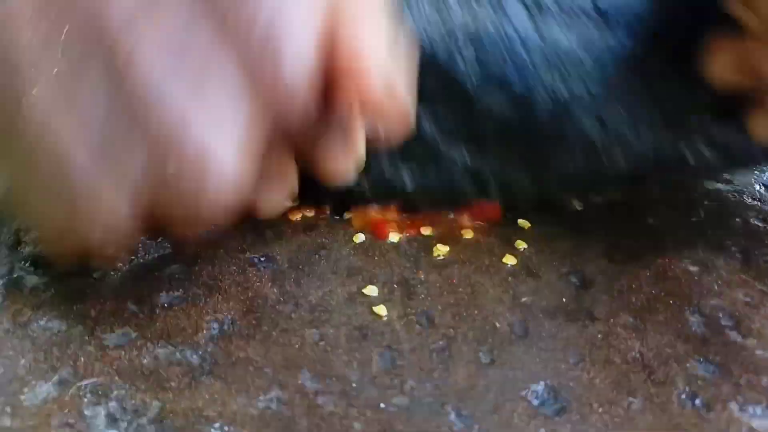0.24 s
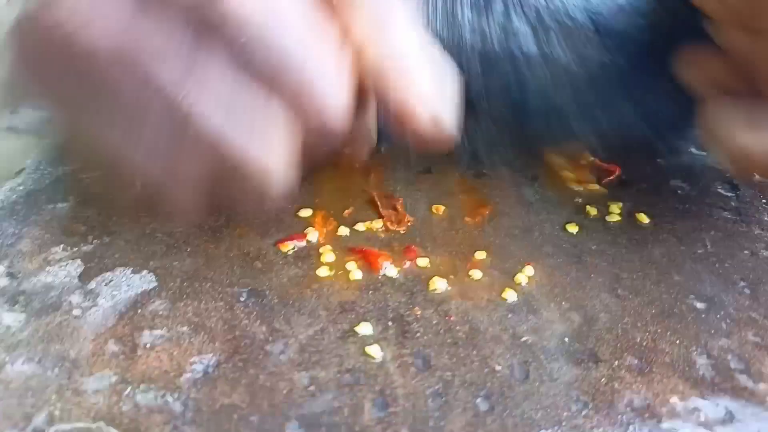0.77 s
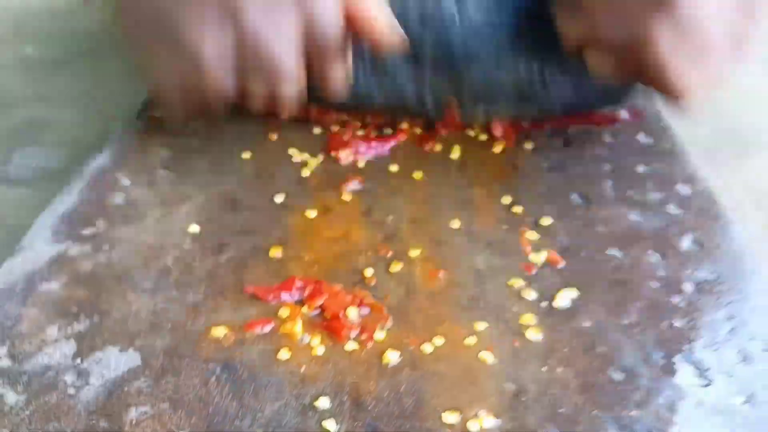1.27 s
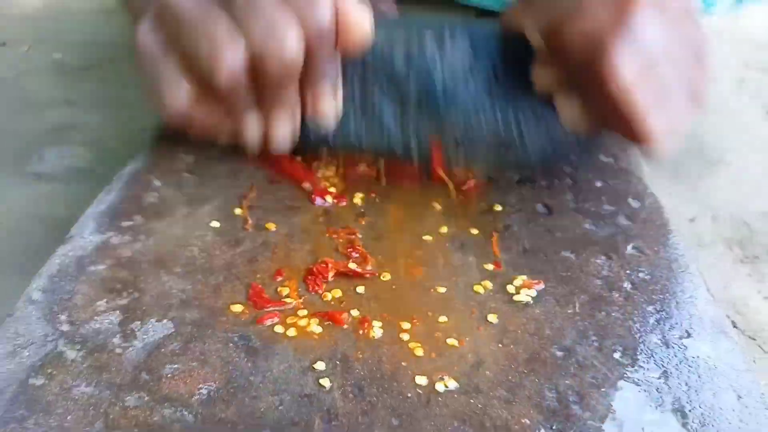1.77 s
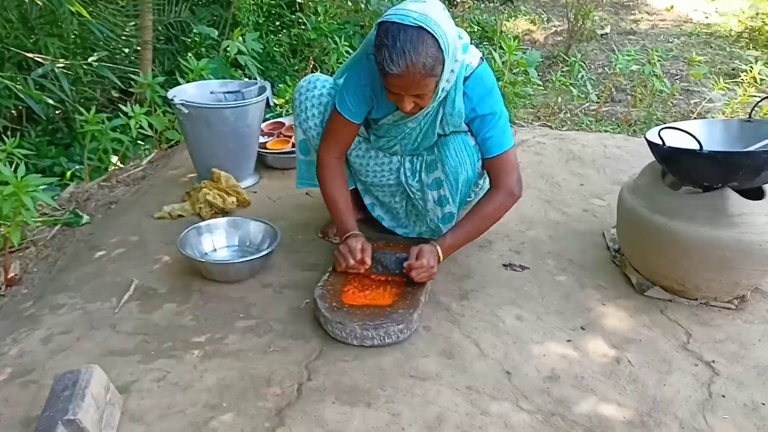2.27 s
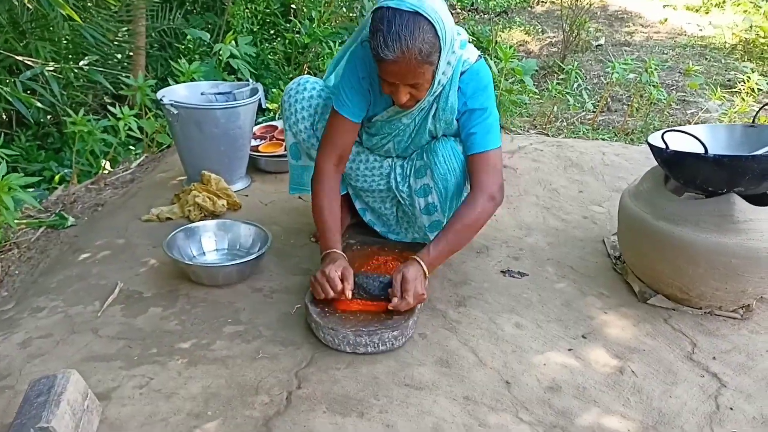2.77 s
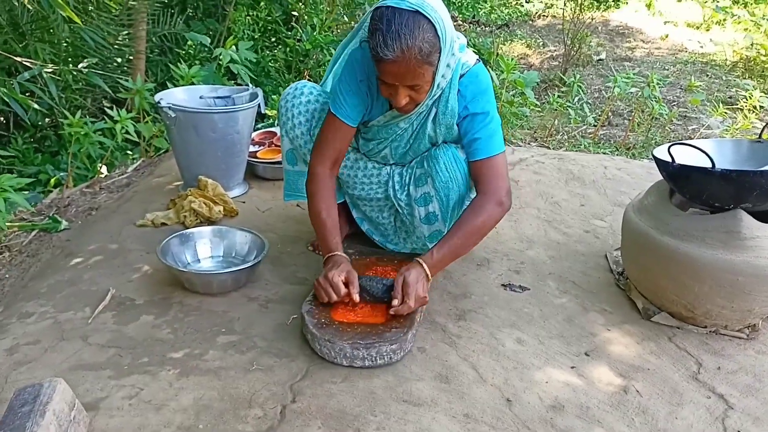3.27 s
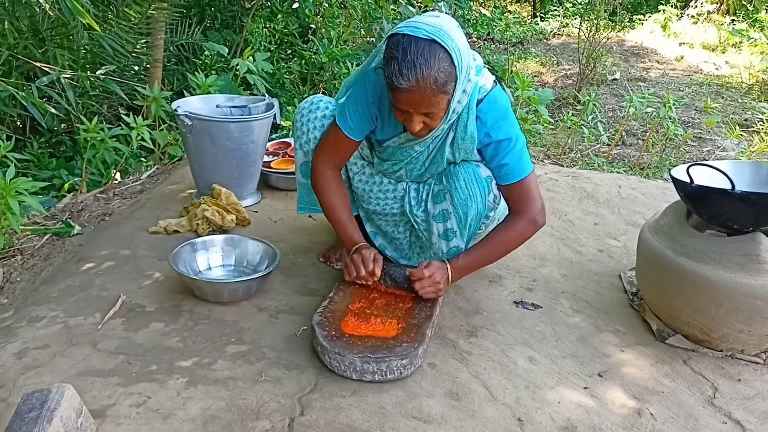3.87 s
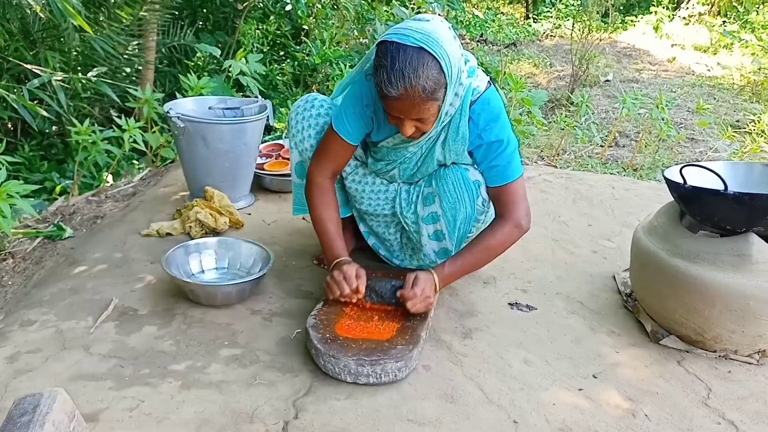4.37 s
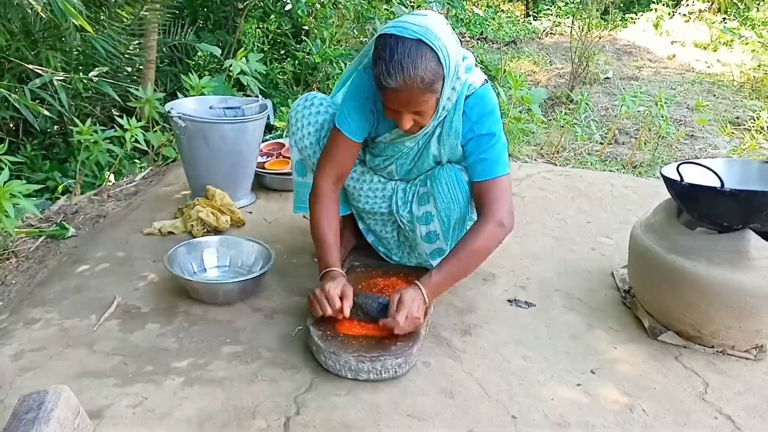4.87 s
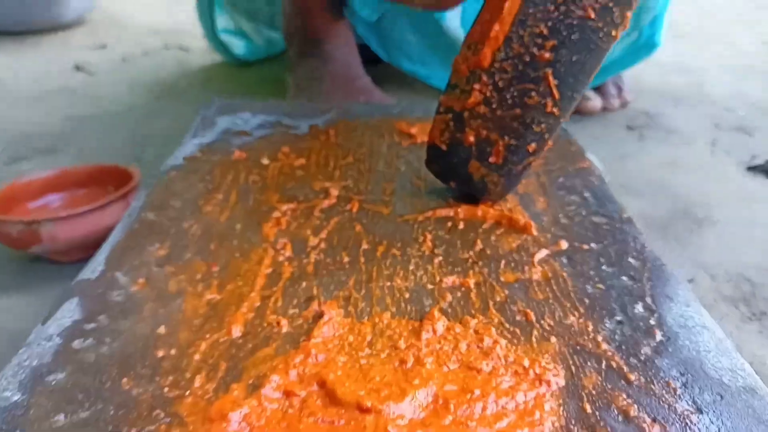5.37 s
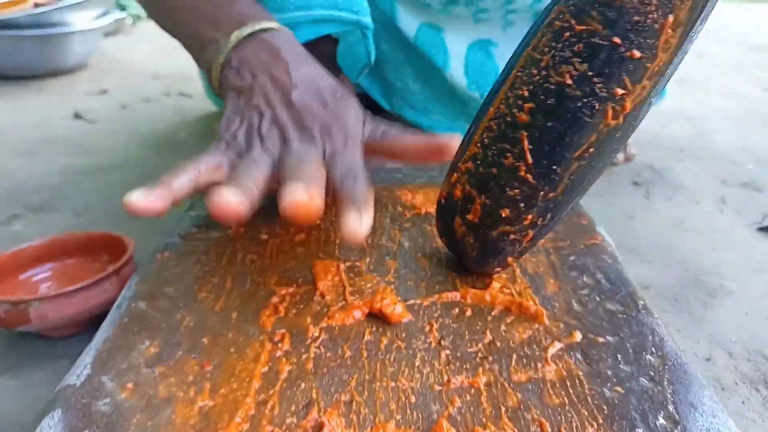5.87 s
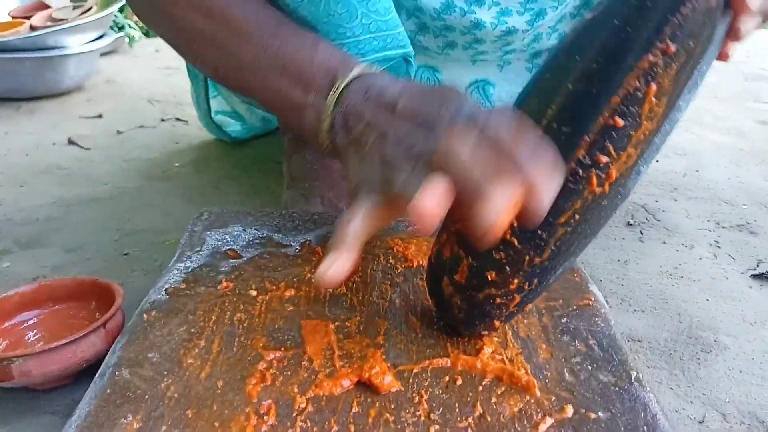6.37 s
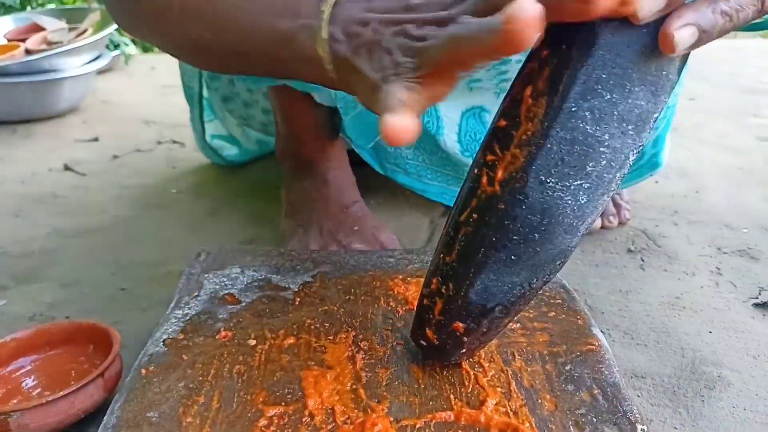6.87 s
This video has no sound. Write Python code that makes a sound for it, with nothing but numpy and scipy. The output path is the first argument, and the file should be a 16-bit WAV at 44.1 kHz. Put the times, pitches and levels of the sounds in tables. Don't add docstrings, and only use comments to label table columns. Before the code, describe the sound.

Fast crunchy stone-on-stone grinding with knocks and seed pops, then distant moist scraping with insects, a fowl call, and gentle wiping in a yard.

```python
import sys
import numpy as np
from scipy import signal
from scipy.fft import rfft, irfft
from scipy.io import wavfile
from scipy.ndimage import uniform_filter1d

SR = 44100
rng = np.random.default_rng(int(sys.argv[2]) if len(sys.argv) > 2 else 0)


def level_to_linear(level):
    exponent = np.asarray(level, float) / 20
    return 10 ** exponent


def wav_out(sig):
    wavfile.write(sys.argv[1], SR, np.round(np.clip(np.atleast_2d(sig).T, -1, 1) * 32767).astype(np.int16))


N = 313977

SCENE_CHANGE_S = 2.39
LIFT_S = 5.49
STEP = 64
# mode_hz, friction_db, struck_db, t60_s
SLAB_MODES = [(563, -13, -2, 0.026), (716, -6.5, -9, 0.032), (990, -14.5, -13, 0.066),
              (1300, -3.5, 1, 0.11), (1306.6, 13.5, 4.5, .065), (1380, -5.5, -4, 0.012),
              (1452, -10.5, -3.5, .06), (1735, -10, -4, 0.048), (1937, -12, -0.5, .03),
              (2050, -13, -3, .03), (2500, -15, -6.5, .035), (3340, -17, -2.5, 0.059)]


def colour(x, points):
    hz, db = np.transpose(points)
    grid_hz = np.fft.rfftfreq(4096, 1 / SR) + 1
    log_gain = np.interp(np.log(grid_hz), np.log(hz), db) * np.log(10) / 20
    cepstrum = irfft(log_gain)
    cepstrum[1:2048] *= 2
    cepstrum[2049:] = 0
    response = irfft(np.exp(rfft(cepstrum)))
    return signal.fftconvolve(x, response)[:N]


def band(x, lo_hz, hi_hz):
    return signal.sosfilt(signal.butter(3, [lo_hz, hi_hz], "band", fs=SR, output="sos"), x)


def unit(x, lo_hz, hi_hz):
    return x / np.std(band(x, lo_hz, hi_hz))


def ring(x, hz, t60_s):
    radius = np.exp(-np.log(1000) / (t60_s * SR))
    angle = 2 * np.pi * hz / SR
    return signal.lfilter([np.sin(angle)], [1, -2 * radius * np.cos(angle), radius**2], x)


def walk(rate_hz):
    hold = int(SR / rate_hz)
    levels = np.repeat(rng.standard_normal(N // hold + 1), hold)
    return 1.31 * uniform_filter1d(levels, hold)[:N]


def grains(rate_hz, spread_db, hiss):
    size = level_to_linear(spread_db * np.minimum(rng.exponential(size=N), 4.3))
    clicks = size * rng.choice([-1, 1], N) * (rng.random(N) < rate_hz / SR)
    return clicks / np.std(clicks) + hiss * rng.standard_normal(N)


def patchy(x, patch_db, rate_hz):
    edges_hz = 9300 * 2 ** (np.arange(-15, 1) / 3)
    return sum(level_to_linear(patch_db * walk(rate_hz)) * band(x, lo, hi) for lo, hi in zip(edges_hz, edges_hz[1:]))


def clock():
    return np.arange(0, N + STEP, STEP) / SR


def every_sample(gains):
    t = np.arange(N) / SR
    return [np.interp(t, clock(), 20 * np.log10(gain + 1e-8)) for gain in gains]


def swell(mid_s, half_s, peak_db, fall_db, power=2, rise=1):
    away = (clock() - mid_s) / half_s
    stretched = np.where(away < 0, -away / rise, away * rise)
    return level_to_linear(peak_db - fall_db * stretched ** power)


def strokes():
    # fastest_s, half_s, grit_db, thrum_over_grit_db, ring_over_grit_db
    pulls = [(0.117, 0.075, -40.5, -1.5, -7.5), (0.547, 0.081, -38, -10.5, -10),
             (0.953, 0.056, -41.5, -0.5, 6.5), (1.047, 0.021, -39, -4, -10), (1.372, 0.078, -35, -1, -7),
             (1.793, 0.078, -37.5, -2, -2.5), (2.208, 0.083, -37, -5, -5.5), (2.667, 0.088, -57.5, 4, 6),
             (3.089, 0.075, -57.5, 5, -3), (3.505, 0.083, -54, 7.5, -4), (3.922, 0.076, -56, 7, -3),
             (4.345, 0.082, -53.5, 6.5, 2.5), (4.783, 0.087, -53.5, 4.5, -16),
             (5.224, 0.079, -54, 3.5, -10)]
    pushes = [(0.298, 0.068, -31.5, -11, -15.5), (0.713, 0.072, -34.5, -7.5, -10),
              (1.135, 0.068, -30, -11.5, -18.5), (1.546, 0.072, -29.5, -14, -12.5),
              (1.959, 0.081, -33, -10.5, -8.5), (2.345, 0.041, -39.5, -9.5, -14),
              (2.457, 0.068, -50.5, 0, 0.5), (2.848, 0.079, -48.5, 3.0, 1.5), (3.265, 0.08, -51, 2, -3),
              (3.685, 0.077, -51, -0.5, -10.5), (4.104, 0.095, -51, -1, -11.5),
              (4.541, 0.1, -51.5, -1.5, -9.5), (4.966, 0.092, -49, -0.5, -7),
              (5.393, 0.1, -51.0, -1.5, -17)]
    # fall_at_half_db, rest_db
    dry_follow = [(20, -58.5), (11, -62.5), (18.5, -74.5), (17, -69.5)]
    wet_follow = [(17.8, -78), (16.4, -75), (24.6, -90), (24, -105)]
    # grit_s, thrum_s, ring_s, fizz_s
    dry_lags = [(0, -0.0077, -0.0057, 0), (0, .014, .006, -.002)]
    wet_lags = [(0, 0.00018, -0.01, 0.0017), (0, 0.012, 0.015, -0.0052)]
    dry_rise = (0.98, 0.85)
    wet_rise = (1.016, 1.052)
    thrum_offset_db, bluntness = 1, 2.3
    dry_ring_db, wet_ring_db = -1, 2.5
    dry_fizz_db, wet_fizz_db = -16.5, 3.65
    t = clock()
    near_now = t < SCENE_CHANGE_S
    gain = np.array([level_to_linear(np.where(near_now, dry_row[1], wet_row[1]))
                     for dry_row, wet_row in zip(dry_follow, wet_follow)])
    for way, rows in enumerate((pulls, pushes)):
        for mid_s, half_s, grit_db, thrum_db, ring_db in rows:
            near = mid_s < SCENE_CHANGE_S
            if near:
                follow, lags, rise = dry_follow, dry_lags, dry_rise
                over_db = (0, thrum_db + thrum_offset_db, ring_db + dry_ring_db, dry_fizz_db)
            else:
                follow, lags, rise = wet_follow, wet_lags, wet_rise
                over_db = (0, thrum_db + thrum_offset_db, ring_db + wet_ring_db, wet_fizz_db)
            for k, (fall_db, _) in enumerate(follow):
                stroke = swell(mid_s + lags[way][k], half_s, grit_db + over_db[k], fall_db, bluntness, rise[way])
                gain[k] += stroke * (near_now == near)
    return every_sample(gain * (t < LIFT_S))


def roller():
    # freq_hz, level_db (per Hz)
    dry_colour = [(180, -42), (300, -16.5), (978, -8), (1150, -14), (1300, -6.5), (1430, -7), (2280, -3.5),
                  (7080, -3.5), (10000, -10.5), (15000, -3.5), (16000, -24.5)]
    wet_colour = [(180, -48), (300, -15), (565, -20.5), (787, -7), (961, -21), (1320, -18.5), (2650, -25),
                  (3290, -16), (6000, -15.5), (7300, -9), (8500, -3), (9700, -21), (16000, -27.5)]
    ground_colour = [(15, -56.5), (25, -29), (107, -0.5), (198, 4.5), (348, -11.5), (500, -17), (650, -39),
                     (1100, -120)]
    grit_db, thrum_db, ring_db, fizz_db = strokes()
    near = np.arange(N) < SCENE_CHANGE_S * SR
    bumps = walk(45)
    touch = level_to_linear(1.8 * bumps) * np.where(near, grains(1500, 3.4, 1.0), grains(900, 5.0, 1.0))
    dry_crackle = unit(colour(touch, dry_colour), 2200, 7000)
    wet_crackle = unit(colour(touch, wet_colour), 2200, 7000)
    crackle = np.where(near, dry_crackle, wet_crackle)
    grit = unit(patchy(crackle, patch_db=2.8, rate_hz=40), 2200, 7000)
    fizz = unit(band(crackle, 9300, 16500), 9500, 15500)
    drag = level_to_linear(3.5 * bumps + walk(22)) * grains(160, 2.6, 0.62)
    slab = sum(level_to_linear(db) * ring(drag, hz, t60_s) / np.sqrt(t60_s) for hz, db, _, t60_s in SLAB_MODES)
    thrum = colour(level_to_linear(3.5 * bumps + 1.7 * walk(30)) * rng.standard_normal(N), ground_colour)
    fizz_trace = level_to_linear(-87) * (grit_db > -100)
    sound = level_to_linear(grit_db) * grit + (level_to_linear(fizz_db) + fizz_trace) * fizz
    sound += level_to_linear(ring_db) * unit(slab, 1100, 1420)
    sound += level_to_linear(thrum_db) * unit(thrum, 55, 370)
    return sound, grit_db


def crickets():
    # pitch_hz, waver_hz, level_db, trills_hz, pulses_hz
    singers = [(8645, 35, -73, 9.1, 37), (8200, 60, -83, 7.3, 45)]
    t = np.arange(N) / SR
    higher_hz = 100 * (t > SCENE_CHANGE_S) * (t < LIFT_S)
    out = np.zeros(N)
    for hz, waver_hz, db, trills_hz, pulses_hz in singers:
        pitch_hz = hz + higher_hz + waver_hz * walk(250)
        tone = np.sin(2 * np.pi * np.cumsum(pitch_hz) / SR)
        trill_db = 5 * np.sin(2 * np.pi * trills_hz * t + 1.4)
        pulse_db = 5.7 * np.sin(2 * np.pi * pulses_hz * t + walk(4))
        out += level_to_linear(db + trill_db + pulse_db + 1.5 * walk(33)) * tone
    return out


def soft_push():
    push = np.zeros(4000)
    push[:9] = np.hanning(9)
    return push


def thumps():
    # start_s, peak_db, pitch_hz
    rocking = [(0.089, -37.5, 80.7), (0.089, -22.5, 134), (0.733, -23.5, 144), (0.942, -27, 226),
               (1.035, -26.5, 106), (1.129, -25.5, 170), (1.176, -29.5, 180), (1.452, -24.5, 144),
               (1.545, -29, 185), (1.757, -36, 266), (1.759, -29, 167), (1.865, -30, 109)]
    out, push = np.zeros(N), soft_push()
    for start_s, db, hz in rocking:
        thump = ring(ring(push, hz, 0.06), hz, 0.029)
        i = int(start_s * SR)
        out[i:i + len(push)] += level_to_linear(db - 4) * thump / np.abs(thump).max()
    return out


def knocks():
    # start_s, peak_db, colour_hz
    light_blows = [(0.162, -19.5, 560), (0.169, -22, 1160), (0.5, -26.5, 560), (0.534, -31.5, 1270),
                   (0.797, -36.5, 1450), (0.911, -25.5, 574), (0.924, -26, 520), (0.935, -25.5, 1220),
                   (1.033, -36, 2396), (1.716, -43, 1270), (2.29, -41, 1450), (2.65, -25, 1170),
                   (3.048, -50.5, 1290), (3.289, -36.5, 950), (3.484, -33, 1130), (3.498, -44, 1330),
                   (4.316, -40, 790), (4.334, -39.5, 1090), (4.945, -38, 1350), (5.612, -49.5, 479),
                   (5.869, -58, 411), (6.029, -60, 700), (6.268, -56, 600), (6.369, -62, 584),
                   (0.212, -38.5, 600), (0.765, -31, 680), (1.215, -44, 600), (1.615, -38, 650),
                   (1.866, -41.5, 420), (3.905, -41, 835)]
    # start_s, peak_db, colour_hz, fall_db (per octave squared)
    hard_blows = [
        (1.1021, -4.5, 2000, 26),
        (1.9128, -4, 1700, 10),
        (1.1025, -22, 850, 14),
        (1.913, -23, 730, 80),
    ]
    light_fall_db = 17
    blows = list(hard_blows) + [(*blow, light_fall_db) for blow in light_blows]
    out, push = np.zeros(N), soft_push()
    for start_s, db, centre_hz, fall_db in blows:
        blow = np.zeros(len(push))
        for hz, _, struck_db, t60_s in SLAB_MODES:
            sign = rng.choice([-1, 1])
            detuned_hz = hz * (1 + 0.008 * rng.standard_normal())
            mode_db = struck_db - fall_db * np.log2(hz / centre_hz) ** 2
            blow += sign * level_to_linear(mode_db) * ring(push, detuned_hz, 0.75 * t60_s)
        blow = band(blow, 0.41 * centre_hz, 2.8 * centre_hz)
        i = int(start_s * SR)
        out[i:i + len(push)] += level_to_linear(db) * blow / np.abs(blow).max()
    return out


def snaps(rows):
    out, t = np.zeros(N), np.arange(3000) / SR
    for start_s, db, hz, width, click_db, decay_ms in rows:
        burst_gain = (1 - np.exp(-t / 0.00021)) * np.exp(-t * 1000 / decay_ms)
        tail_gain = level_to_linear(-36) * np.exp(-t / 0.015)
        push = rng.standard_normal(len(t)) * (burst_gain + tail_gain)
        push[0] = level_to_linear(click_db)
        spread = 1 + width
        burst = band(push, max(hz / spread, 2200), min(hz * spread, 16300))
        burst += level_to_linear(-9) * spread / 2 * (band(push, 2700, 8500) + band(push, 11500, 16300))
        i = int(start_s * SR)
        out[i:i + len(t)] += level_to_linear(db) * burst / np.abs(burst).max()
    return out


def pops():
    # start_s, peak_db, colour_hz, width_over_colour, click_over_burst_db
    bursts = [
        (0.2112, -6, 12500, 0.56, 3.5),
        (0.2153, -5, 13170, 0.46, 5.5),
        (4.0513, -16, 9000, 0.28, 23),
        (5.945, -13, 7330, 1.2, 18.5),
        (6.777, -22.5, 12800, 2.04, 14),
        (6.7908, -43, 13040, .25, -1.5),
    ]
    return snaps([(*row, 2.3) for row in bursts])


def cracks():
    # start_s, peak_db, colour_hz
    releases = [(0.266, -19.5, 5230), (0.5193, -25.5, 5200), (0.5415, -19, 5070), (0.5755, -26.5, 7560),
                (0.6816, -15, 2800), (0.7002, -14.5, 6800), (0.9558, -25, 4670), (1.032, -29.5, 7400),
                (1.049, -25, 3730), (1.3398, -28.5, 7040), (1.485, -27.5, 2530), (2.2906, -26, 13400),
                (2.3895, -36, 8200), (2.7284, -38, 7160), (2.781, -35, 7600), (2.808, -28.5, 7730),
                (2.8552, -35, 8400), (3.0065, -49, 8660), (3.242, -27.5, 8300), (3.2856, -27, 7900),
                (3.5, -30.5, 7470), (3.7244, -32.5, 7800), (4.369, -37, 11000), (4.4432, -43, 7860),
                (4.7326, -31.5, 7450), (4.7936, -30, 8160), (4.9139, -27, 6640), (5.0245, -32, 5900),
                (5.327, -32.5, 8600)]
    # start_s, peak_db, colour_hz, width_over_colour, click_over_burst_db
    squelch = [
        (4.9432, -27, 7450, .12, 0),
        (4.951, -23, 7600, .12, 0),
        (4.9565, -25, 7400, .12, 0),
    ]
    width, click_db, decay_ms, squelch_ms = 0.53, 7, 1.9, 4.9
    rows = [(*row, width, click_db, decay_ms) for row in releases]
    return snaps(rows + [(*row, squelch_ms) for row in squelch])


def cicada():
    # centre_hz, width_hz, level_db, last_heard_s
    buzzer = (7248.5, 230, -84, 3.5)
    hz, width_hz, db, last_s = buzzer
    t = np.arange(N) / SR
    buzz = unit(band(rng.standard_normal(N), hz - width_hz, hz + width_hz), 6000, 10000)
    return level_to_linear(db + 2.3 * walk(65)) * buzz * (t > SCENE_CHANGE_S) * (t < last_s)


def far_calls():
    # start_s, end_s, start_hz, end_hz, level_db
    fowl = [
        (4.972, 5.08, 728, 806, -69),
        (5.185, 5.368, 790, 758, -69),
        (5.369, 5.453, 787, 780, -52.5),
        (5.447, 5.489, 758, 710, -65),
    ]
    birds = [
        (5.514, 5.601, 7230, 4800, -84),
        (6.884, 6.951, 1950, 1600, -71.5),
        (6.92, 6.963, 3700, 3620, -68),
        (6.945, 7.006, 3360, 3000, -71.5),
        (7.043, 7.11, 3840, 3180, -74),
    ]
    calls = [(*call, -16) for call in fowl] + [(*call, -41.5) for call in birds]
    out, rough = np.zeros(N), walk(170)
    for start_s, end_s, start_hz, end_hz, db, third_db in calls:
        i, j = int(start_s * SR), min(int(end_s * SR), N)
        pitch_hz = np.linspace(start_hz, end_hz, j - i) * (1 + 0.012 * rough[i:j])
        phase = 2 * np.pi * np.cumsum(pitch_hz) / SR
        tone = np.sin(phase) + level_to_linear(third_db) * np.sin(3 * phase)
        out[i:j] += level_to_linear(db + 4) * np.hanning(j - i) ** 0.34 * tone
    return out


def yard():
    # middle_s, half_s, rub_db, fizz_db
    swipes = [
        (5.698, 0.085, -70.5, -76),
        (5.96, .05, -78.5, -70),
        (6.449, 0.1, -78, -80),
        (6.56, .08, -85, -72),
        (6.797, 0.033, -62.5, -66),
        (7.103, .25, -78, -84.5),
    ]
    # middle_s, half_s, level_db
    pulses = [
        (6.18, 0.083, -62.5),
        (6.571, 0.066, -62.5),
        (6.986, .13, -60.5),
    ]
    # time_s, level_db
    breeze = [
        (5.5, -63),
        (5.75, -68),
        (5.9, -72),
        (5.97, -64),
        (6.1, -68),
        (6.3, -64.5),
        (6.76, -69.5),
        (6.79, -62),
        (6.97, -59),
        (7.05, -66),
    ]
    rub_rest_db, fizz_rest_db, pulse_rest_db = -70.5, -79, -82
    fall_db = 11
    open_s, opening_s, shut_db = 5.6, 0.015, -14.5
    t = clock()
    rub = level_to_linear(rub_rest_db) + sum(swell(mid_s, half_s, db, fall_db) for mid_s, half_s, db, _ in swipes)
    fizz = level_to_linear(fizz_rest_db) + sum(swell(mid_s, half_s, db, fall_db) for mid_s, half_s, _, db in swipes)
    pulse = level_to_linear(pulse_rest_db) + sum(swell(mid_s, half_s, db, fall_db) for mid_s, half_s, db in pulses)
    air = level_to_linear(np.interp(t, *np.transpose(breeze)))
    gate = level_to_linear(shut_db * np.clip((open_s - t) / opening_s, 0, 1)) * (t >= LIFT_S)
    return every_sample(np.array([rub, air, pulse, fizz]) * gate)


def wiping():
    # freq_hz, level_db (per Hz)
    hiss_colour = [(400, -19), (700, -14), (1000, -15), (1600, -9.5), (4200, -8.5), (7700, -7),
                   (8800, -3.5), (9300, -17.5), (15000, -5), (16000, -22)]
    air_colour = [(15, -68), (25, -32.5), (54, -4.5), (216, -4), (380, -12), (426, -9), (762, -19),
                  (1200, -29), (1560, -29), (2640, -120)]
    rub_db, air_db, pulse_db, fizz_db = yard()
    hiss = colour(level_to_linear(1.6 * walk(26)) * grains(6000, 1.1, 2.5), hiss_colour)
    air = colour(level_to_linear(4.6 * walk(6.7)) * rng.standard_normal(N), air_colour)
    pulse = level_to_linear(2.5 * walk(90)) * band(rng.standard_normal(N), 6150, 6950)
    sound = level_to_linear(rub_db) * unit(band(hiss, 550, 9200), 1330, 7260)
    sound += level_to_linear(air_db) * unit(air, 60, 700)
    sound += level_to_linear(fizz_db) * unit(band(hiss, 9200, 16500), 10000, 15500)
    sound += level_to_linear(pulse_db - 4.5) * unit(pulse, 5300, 8200)
    return sound, rub_db


def insect_gate(grit_db, rub_db):
    threshold_db, slope, lag_s = -70, 0.7, 0.02
    loudest_db = np.maximum(grit_db, rub_db + 5)
    gate_db = slope * np.clip(loudest_db - threshold_db, -30, 0)
    t = np.arange(N) / SR
    gate_db += 1.5 * (t > SCENE_CHANGE_S) * (t < LIFT_S)
    keep = np.exp(-1 / (lag_s * SR))
    return signal.lfilter([1 - keep], [1, -keep], level_to_linear(gate_db))


def scene():
    grinding, grit_db = roller()
    wipe, rub_db = wiping()
    insects = insect_gate(grit_db, rub_db) * (crickets() + cicada())
    steady = grinding + insects + cracks() + far_calls() + wipe
    steady = signal.sosfilt(signal.ellip(12, 0.3, 60, 15550, fs=SR, output="sos"), steady)
    sharp = signal.sosfilt(signal.ellip(8, 0.2, 60, 16250, fs=SR, output="sos"), pops())
    mono = steady + thumps() + knocks() + sharp
    return np.array([mono, mono])


def roll_off(x):
    return signal.sosfilt(signal.butter(12, 16850, fs=SR, output="sos"), x)


def record(dry):
    thin = signal.sosfilt(signal.butter(3, 44, "high", fs=SR, output="sos"), dry)
    return roll_off(thin)


dry = scene()
out = record(dry)
wav_out(out)
```